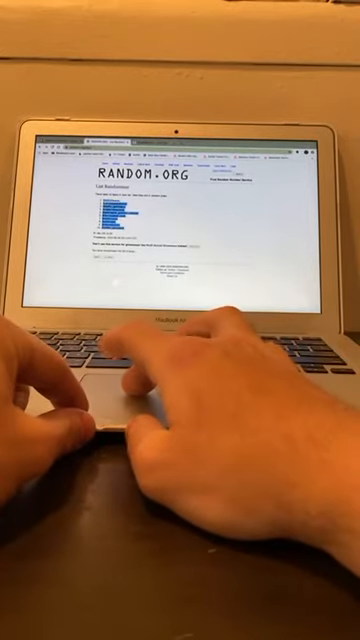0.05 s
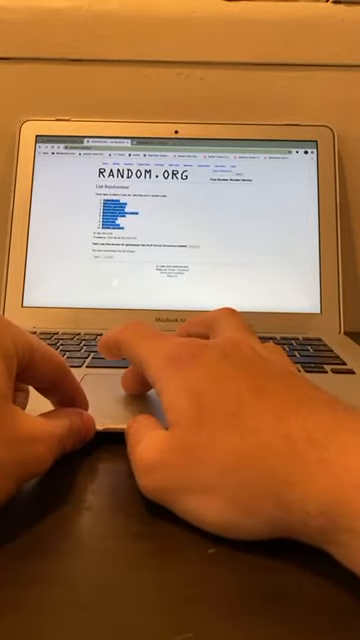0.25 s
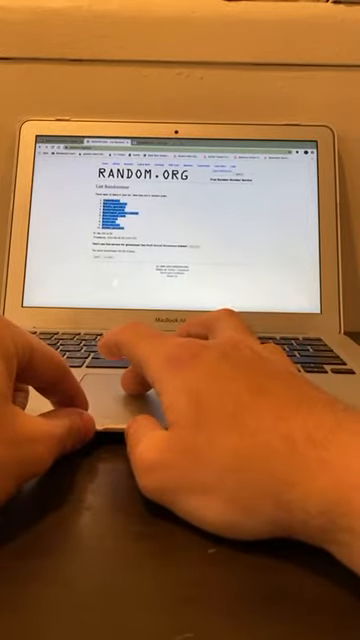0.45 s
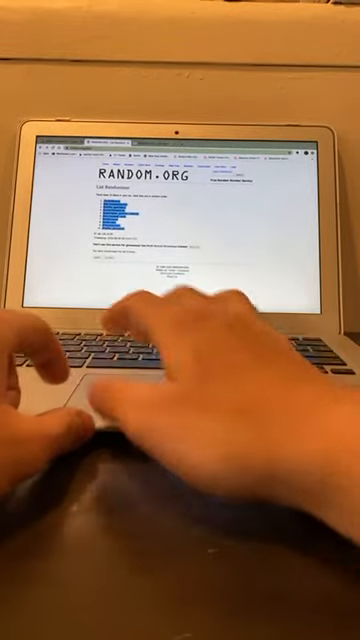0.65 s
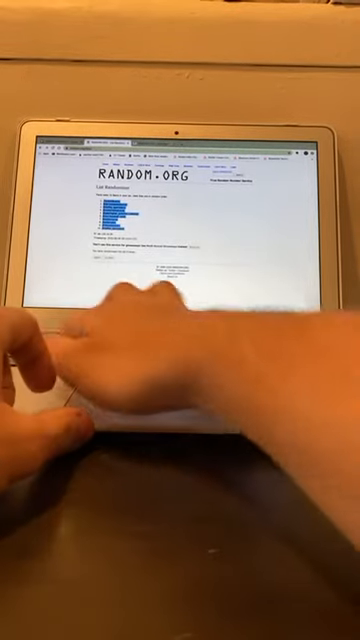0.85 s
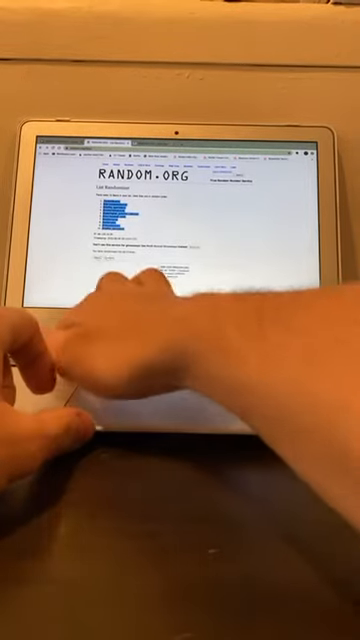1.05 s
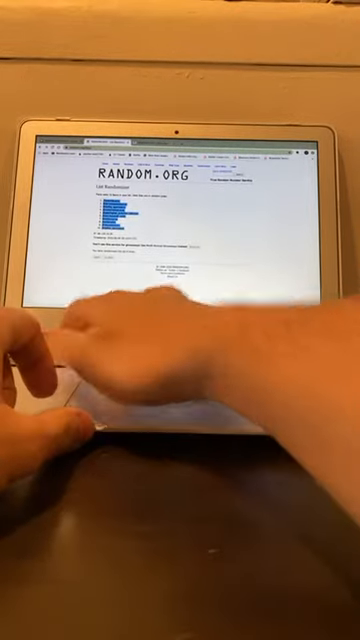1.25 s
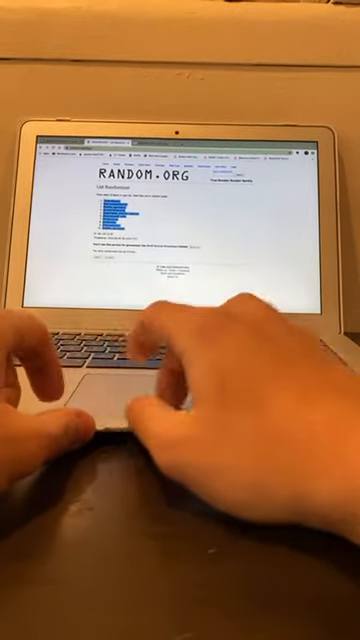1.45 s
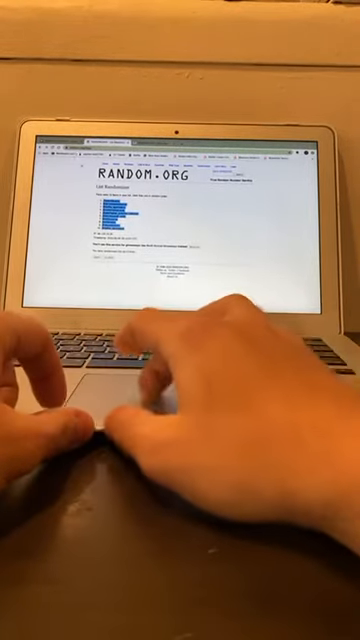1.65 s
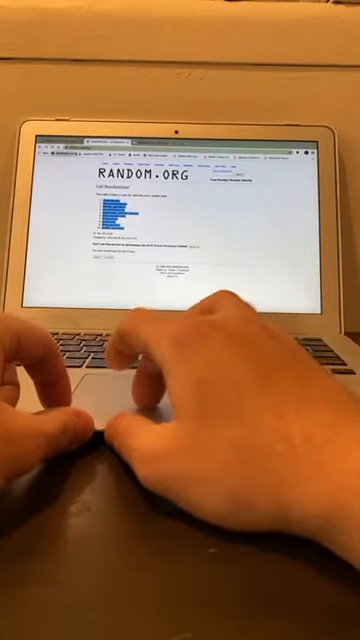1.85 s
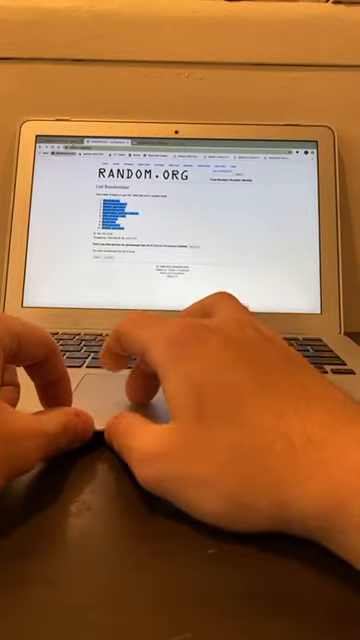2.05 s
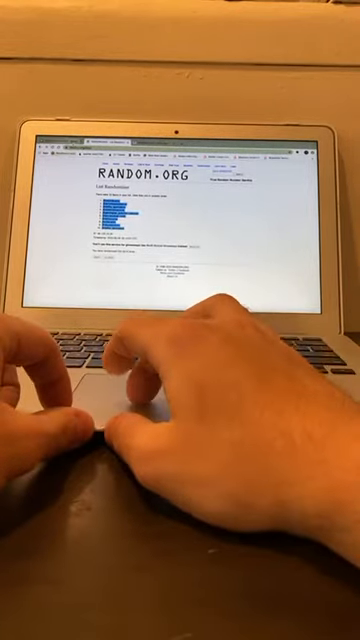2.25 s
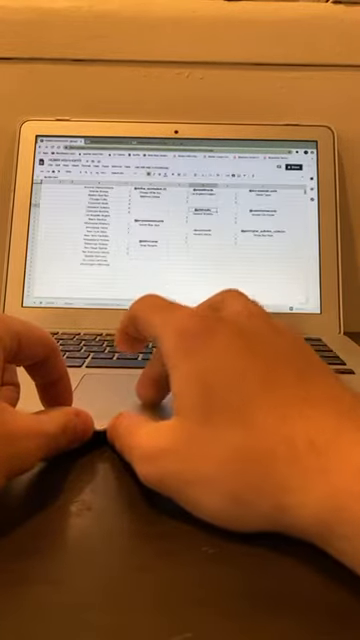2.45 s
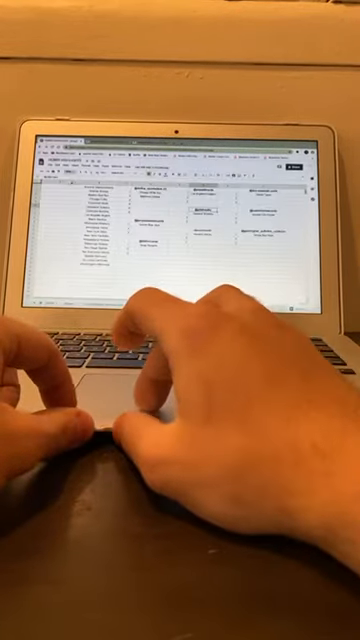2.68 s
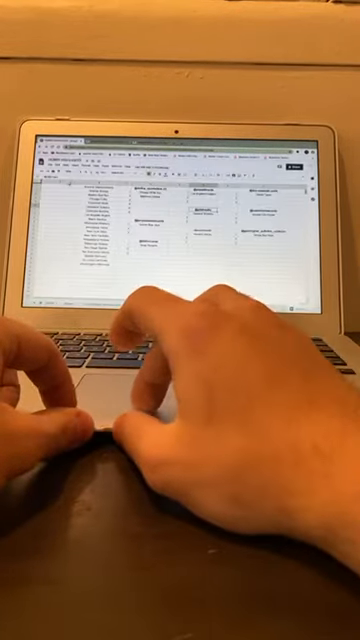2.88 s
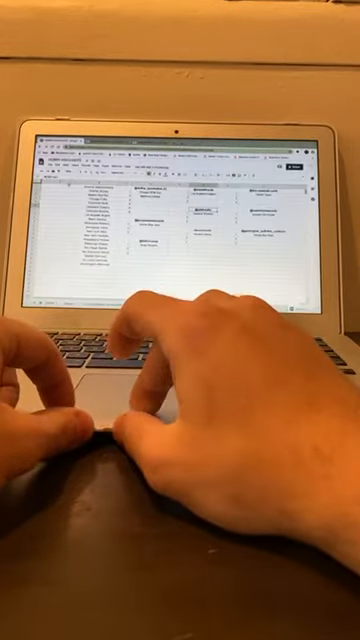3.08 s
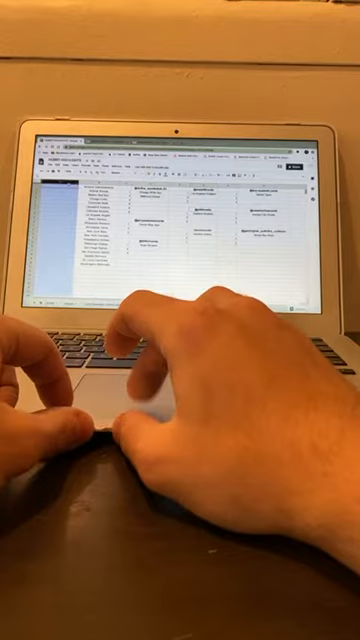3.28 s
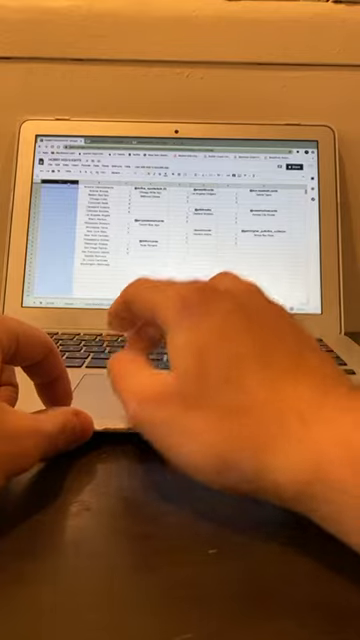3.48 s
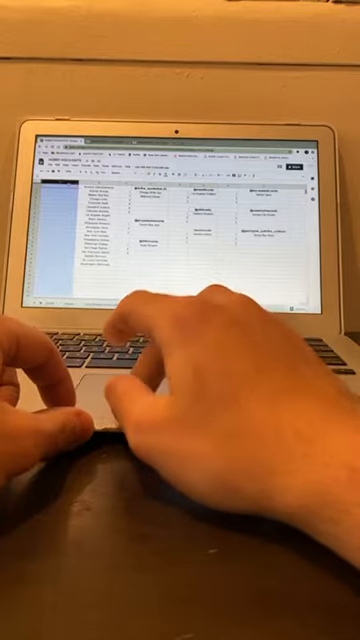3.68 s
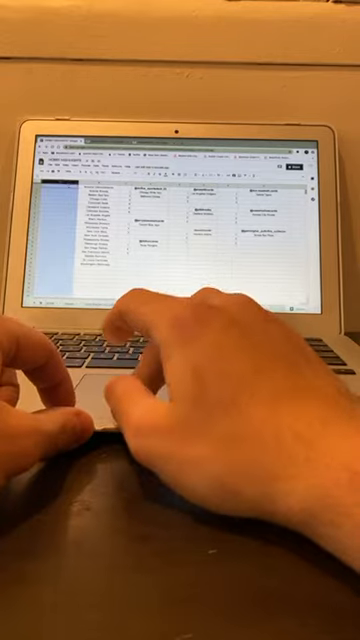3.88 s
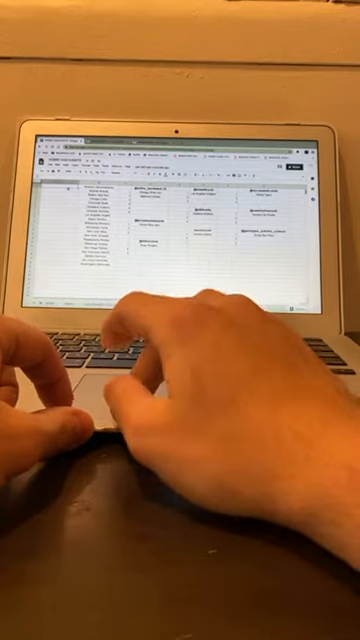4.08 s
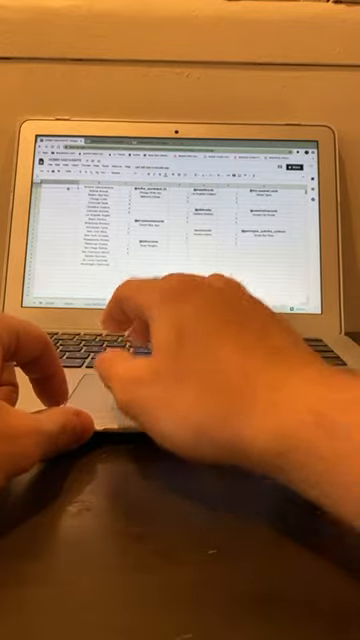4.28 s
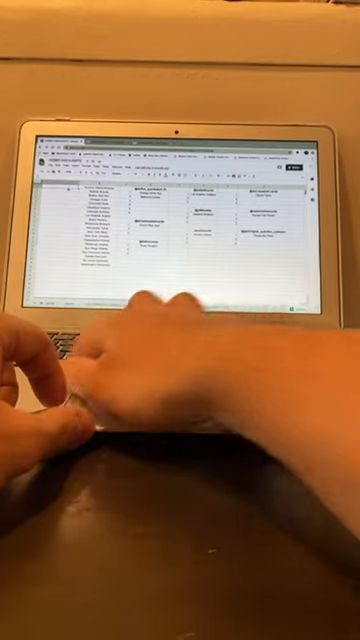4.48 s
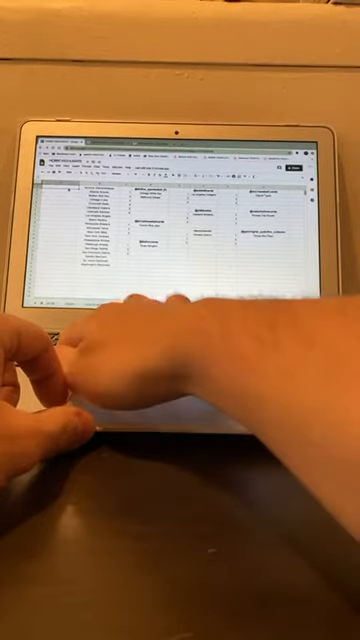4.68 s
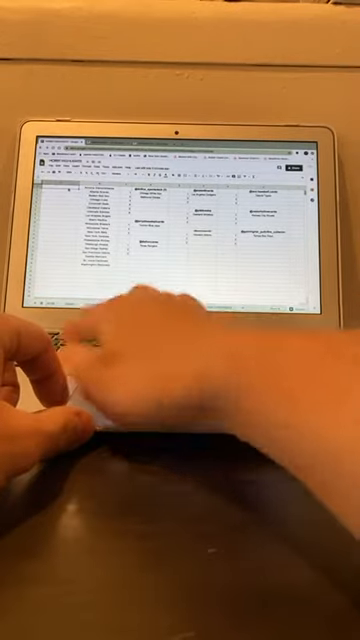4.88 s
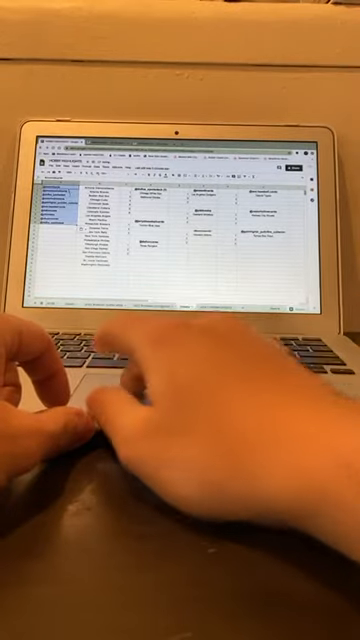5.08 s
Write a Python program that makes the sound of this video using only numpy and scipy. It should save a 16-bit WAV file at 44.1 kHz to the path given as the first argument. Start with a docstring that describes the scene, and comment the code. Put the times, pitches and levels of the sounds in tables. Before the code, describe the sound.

Close above a laptop on a wooden desk in a small quiet room, skin brushes the palm rest and a few plastic keys tick, with soft fingertip thuds on the case. The trackpad then clicks three times, about a second apart, thudding gently on each press and release. More light key ticks and brief rubs follow. A low throbbing hum and soft hiss run underneath.

```python
"""A small quiet room, close above a laptop on a wooden desk.
The trackpad clicks three times as its metal dome snaps, with a thud on each press and release.
Plastic keys tick, fingertips thud on the case and skin rubs over the desk and palm rest.
Low room resonances boom briefly after each thud.
Underneath, motors at nearly the same speed beat into a low, throbbing hum over a soft hiss."""
import sys
import numpy as np
from scipy import signal
from scipy.fft import rfft, irfft
from scipy.io import wavfile
from scipy.ndimage import uniform_filter1d

SR = 44100
rng = np.random.default_rng(int(sys.argv[2]) if len(sys.argv) > 2 else 0)


def dump(signal):
    """Clip the signal to [-1, 1] and save it as 16-bit WAV at the path in sys.argv[1]."""
    limited = np.clip(np.atleast_2d(signal).T, -1, 1)
    pcm = np.round(limited * 32767).astype(np.int16)
    wavfile.write(sys.argv[1], SR, pcm)


N = 226363
HIT_SAMPLES = 16384
TIME = np.arange(N) / SR
HIT_TIME = TIME[:HIT_SAMPLES]

# Trackpad presses. Each row: start in seconds, level in dB, tilt in dB per octave, hold in seconds.
PAD_PRESSES = [(2.0873, -41, 1.8, 0.084), (2.9277, -42.5, 1, 0.18), (3.893, -42.5, 1, .125)]


def trackpad(lag_cycles=3.03, rise_s=0.00016, plate_t60=0.02, snap_db=-1, rattle_db=-12):
    """A metal dome snaps under the pad; the plate's swing dies fast and the case rattles on."""
    # Modes of the pad and its case. Each row: frequency in Hz, level in dB.
    pad_modes = [(602, -12), (990, -1.5), (1106, 3.5), (1466, -3.5), (1655, -18), (2016, 2.5),
                 (2255, -29.5), (2382, -0.5), (2982, 7.5), (3229, 7), (3415, 3), (3980, 0), (4158, 4.5),
                 (4433, 5), (4581, -23), (4774, 0), (5044, -4), (5652, 2.5), (6101, -8), (6301, -24),
                 (6435, -1), (6578, -8), (6920, -1.5), (7079, -28), (7219, -24), (7730, -36), (7953, -13),
                 (8109, -11), (8303, -26), (8559, -4)]
    # Colours of the snapping dome and the ringing case. Each row: frequency in Hz, level in dB.
    dome_colour = [(400, -10), (800, -2), (2000, 7.5), (3000, -25), (3800, -31), (5400, 11.5), (7000, -30),
                   (8800, -6), (10300, -10), (11800, -7), (16000, -25)]
    rattle_colour = [(200, -19), (430, 14), (750, -31), (1100, -1), (1700, -7), (2400, 6), (3100, -9),
                     (4400, -27), (6000, -4), (8600, 4), (10000, -14), (16000, -26)]
    hz, db = np.transpose(pad_modes)
    age = np.maximum(HIT_TIME - lag_cycles / hz[:, None], 0)  # high bending waves arrive first
    swings = np.sin(2 * np.pi * hz[:, None] * age) * decay(plate_t60, age) * (1 - np.exp(-age / rise_s))
    # The same pad is pressed each time, so one rattle serves every click.
    rattle = noise(rattle_colour, HIT_SAMPLES) * decay(t60=0.16) * ramp(rise_s=0.0012)
    out = np.zeros(N)
    for start, level_db, tilt_db, _ in PAD_PRESSES:
        plate = unit_crest(undb(db + tilt_db * np.log2(hz)) @ swings, window=176)
        snap = noise(dome_colour, HIT_SAMPLES, tilt_db) * decay(t60=0.022)
        add(out, start, undb(level_db) * (plate + undb(snap_db) * snap + undb(rattle_db) * rattle))
    return out


def key_ticks(rise_s=0.00061, ring_octaves=0.14, settle_s=0.0077, settle_tilt_db=5):
    """A touched key gives a short plastic crackle, then settles with a brighter, longer one."""
    # Key and fingernail contacts. Each row: start in seconds, level in dB, tilt in dB per octave,
    # ring frequency in Hz, ring level in dB, settling level in dB relative to the touch.
    contacts = [(.444, -58, -4, 3320, -1.5, -4), (.8162, -48, -8.5, 1800, -8, -14),
                (0.842, -48, 8.5, 8400, -8, -2.5), (1.035, -38.5, -2.1, 8200, -11, -6),
                (1.133, -51.5, 1.5, 1420, -10.5, -1.5), (1.168, -55, 1.5, 6740, -7, -3),
                (1.6387, -55.5, -2.5, 2810, -4, -5.5), (2.3065, -62.5, -1.5, 6170, -8, -15),
                (3.2752, -53, -3.5, 2440, -11, -21), (4.0302, -68.5, -4, 6370, 6, -26),
                (4.0915, -57.5, -0.5, 2720, -4, -10), (4.3848, -47.5, 1, 6550, -4, -4.5),
                (4.4915, -60.5, -8.5, 1990, -9, -16), (4.629, -46, 1.2, 8500, 0, -6),
                (4.723, -52.5, 1, 1394, -10.5, -4), (4.743, -58, 0, 8470, -2, -5.5)]
    # Colour of a plastic key. Each row: frequency in Hz, level in dB.
    key_colour = [(150, -30), (400, -19), (1400, -3), (2500, -5.5), (3400, -1), (4300, -2), (5700, -1),
                  (8700, -4), (9800, -11), (14000, -20), (16000, -15)]

    def crackle(tilt_db, ring_hz, ring_db, t60):
        """A burst of plastic noise with one broad resonance."""
        low_hz, high_hz = ring_hz * 2 ** -ring_octaves, ring_hz * 2 ** ring_octaves
        crack = noise(key_colour, HIT_SAMPLES, tilt_db)
        ring = noise([(low_hz, -30), (ring_hz, 0), (high_hz, -30), (SR / 2, -90)], HIT_SAMPLES)
        return (crack + undb(ring_db) * ring) * decay(t60) * (1 - np.exp(-HIT_TIME / rise_s))

    out = np.zeros(N)
    for start, level_db, tilt_db, ring_hz, ring_db, settle_db in contacts:
        touch = crackle(tilt_db, ring_hz, ring_db, t60=0.04)
        settle = crackle(tilt_db + settle_tilt_db, ring_hz, ring_db, t60=0.081)
        add(out, start, undb(level_db) * touch)
        add(out, start + settle_s, undb(level_db + settle_db) * settle)
    return out


def thuds(press_db=-5, press_hz=320, release_hz=186.5, echo_s=0.019, echo_db=-10):
    """Fingertips, pad presses and pad releases thud softly; a short room echo follows each thud."""
    # Fingertips landing on the case. Each row: start in seconds, level in dB, centre frequency in Hz.
    fingertips = [(.458, -42.5, 203), (.819, -50.5, 380), (1.039, -39.5, 268), (1.041, -30, 105),
                  (1.098, -42, 82), (1.156, -48.5, 202), (1.377, -32.5, 79.7), (1.717, -33.5, 94),
                  (2.305, -37, 84), (3.519, -38.5, 70), (4.629, -48.5, 103), (4.74, -46, 125),
                  (5.006, -48, 70)]
    presses = [(start, db + press_db, press_hz) for start, db, _, _ in PAD_PRESSES]
    releases = [(start + hold, db, release_hz) for start, db, _, hold in PAD_PRESSES]
    out = np.zeros(N)
    for start, level_db, centre_hz in fingertips + presses + releases:
        thud = undb(level_db) * low_boom(centre_hz)
        add(out, start, thud)
        add(out, start + echo_s, undb(echo_db) * thud)
    return out


def low_boom(centre_hz, soft_hz=90, lag_cycles=1.25):
    """Low room resonances boom briefly: a soft touch wakes the lowest, a harder one a wider range."""
    # Low room modes. Each row: frequency in Hz, level in dB, t60 in seconds.
    room_modes = [(58.7, 12.5, 0.13), (86.1, 3.5, 0.27), (110.6, 0, 0.11), (142, 0.5, 0.18),
                  (249.8, -15.5, 0.22), (303, -11, 0.094), (356, -13.5, 0.06), (440, -9.5, 0.09),
                  (597, -11.5, 0.073)]
    spread_octaves = 0.52 * (centre_hz / soft_hz) ** 0.47
    boom = np.zeros(HIT_SAMPLES)
    for k, (hz, db, t60) in enumerate(room_modes):
        scatter_db = rng.normal(0, 1.2)  # balance and pitch vary a little from thud to thud
        detune = rng.normal(0, 0.02)
        age = np.maximum(HIT_TIME - lag_cycles / hz, 0)  # lower modes start later
        push = np.exp(-0.5 * (np.log2(hz / centre_hz) / spread_octaves) ** 2)
        swell = np.sin(np.pi / 2 * np.minimum(age * hz, 1)) ** 2  # builds over one cycle
        swing = np.sin(2 * np.pi * hz * (1 + detune) * age) * decay(t60, age)
        boom += (-1) ** k * undb(db + scatter_db) * push * swell * swing  # alternating polarity
    return unit_crest(boom, window=441)


def hand_rubs(grain_db=0.6, catch_db=1.18, firm_tilt_db=0.7, tilt_per_db=0.043):
    """Skin rubs in countless tiny slips; a firmer slide is louder and brighter."""
    # Hand slides over desk and palm rest, and light fingertip glides along the case.
    # Each row: start, attack and hold in seconds, level in dB.
    slides = [(0.42, 0.15, .03, -60), (0.528, 0.028, 0.045, -46.5), (1.303, 0.024, 0.063, -54),
              (3.316, 0.037, 0.031, -61), (4.122, 0.062, 0.023, -51.5), (4.903, 0.062, 0.059, -58)]
    glides = [(.6, 0.26, .05, -65.5), (4.003, .11, .04, -70), (4.35, 0.071, .03, -74)]
    # Colours of rubbing skin and of the stroked case. Each row: frequency in Hz, level in dB.
    skin_colour = [(500, -7.5), (1200, -11), (2100, -9), (2500, -4), (3700, -2), (5500, -3.5), (7000, -4.5),
                   (8300, -4.5), (9600, -13), (11500, -17), (16000, -25)]
    case_colour = [(600, 5.5), (1500, 0.5), (3800, -4.5), (4300, 6.5), (4800, -3), (7400, 1.5), (8300, 0),
                   (9500, -3.5), (16000, -14)]
    firmest_db = max(db for *_, db in slides)
    rub = np.zeros(N)
    for *timing, db in slides:
        tilt_db = firm_tilt_db + tilt_per_db * (db - firmest_db)
        rub += noise(skin_colour, N, tilt_db) * undb(db) * stroke(*timing, fall_db_per_s=350)
    glide_gain = sum(undb(db) * stroke(*timing, fall_db_per_s=41) for *timing, db in glides)
    rub += noise(case_colour, N) * glide_gain
    roughness = undb(grain_db * wander(rate_hz=1500) + catch_db * wander(rate_hz=90))
    return rub * unit_rms(roughness)


def stroke(start, attack, hold, fall_db_per_s):
    """Envelope of one rub: the hand speeds up, keeps its pace, then slows or lifts."""
    age = TIME - start
    rise = np.sin(np.pi / 2 * np.clip(age / attack, 0, 1))
    return rise * undb(-fall_db_per_s * np.maximum(age - attack - hold, 0))


def room(direct, wall_s=0.0085, wall_db=-13, tail_db=-7):
    """The wall behind the desk throws back one reflection, and a short tail follows."""
    tail_colour = [(150, -8), (1000, -9), (8500, -18.5), (11000, -9.5), (16000, -13)]
    tail = noise(tail_colour, HIT_SAMPLES) * decay(t60=0.13) * ramp(wall_s)
    response = undb(tail_db) * tail / np.linalg.norm(tail)
    response[int(wall_s * SR)] += undb(wall_db)
    return direct + signal.fftconvolve(direct, response)[:N]


def motor_hum(speeds_hz=(58.87, 59.3, 65.15), in_step_s=1.29, waver_db=1.04):
    """Three wavering motor tones beat against each other, all in phase at in_step_s."""
    # Level of each motor in dB.
    levels_db = [-52, -59, -54.5]
    hum = np.zeros(N)
    for hz, db in zip(speeds_hz, levels_db):
        amplitude = np.sqrt(2) * undb(db + waver_db * wander(rate_hz=1.84))
        hum += amplitude * np.cos(2 * np.pi * hz * (TIME - in_step_s))
    return hum


def room_tone(rumble_db=-57, hiss_db=-65.5):
    """A steady bed of faint room rumble and hissing air."""
    # Colours of the rumble and the air. Each row: frequency in Hz, level in dB.
    rumble_colour = [(22, -19), (33, -24.5), (43, 16.5), (52, 2.5), (70, 11), (88, 7), (118, 9.5),
                     (170, -38)]
    air_colour = [(120, -2.5), (175, -2), (220, -6), (330, -2), (450, -9), (800, -13.5), (1500, -18),
                  (3000, -20.5), (5500, -25), (8300, -26.5), (10000, -32.5), (13000, -37.5), (16000, -43)]
    return undb(rumble_db) * noise(rumble_colour, N) + undb(hiss_db) * noise(air_colour, N)


def undb(db):
    """Decibels to gain."""
    return 10 ** (np.asarray(db) / 20)


def unit_rms(x):
    """Scale to rms 1."""
    return x / np.sqrt(np.mean(x ** 2))


def unit_crest(x, window):
    """Scale so that the loudest stretch of `window` samples has rms 1."""
    return x / np.sqrt(uniform_filter1d(x ** 2, window).max())


def ramp(rise_s):
    """Linear attack of one hit."""
    return np.minimum(HIT_TIME / rise_s, 1)


def decay(t60, age=HIT_TIME):
    """Exponential decay that loses 60 dB in t60 seconds."""
    return np.exp(-np.log(1000) * age / t60)


def noise(colour, size, tilt_db=0):
    """Noise of rms 1, shaped by (Hz, dB) points and tilted by tilt_db per octave."""
    hz, db = np.transpose(colour)
    octave = np.log2(np.fft.rfftfreq(size, 1 / SR) + 1)
    curve_db = np.interp(octave, np.log2(hz), db + tilt_db * np.log2(hz), left=-np.inf)
    return unit_rms(irfft(rfft(rng.standard_normal(size)) * undb(curve_db), size))


def wander(rate_hz):
    """Random drift of rms 1 that glides to a new value rate_hz times a second."""
    step = int(SR / rate_hz)
    stairs = np.repeat(rng.standard_normal(N // step + 1), step)
    return unit_rms(uniform_filter1d(stairs, step)[:N])


def add(track, start, sound):
    """Mix a sound in at `start` seconds."""
    i = int(start * SR)
    track[i:i + len(sound)] += sound[:N - i]


def scene():
    """Mono mix: clicks with their room tail, then thuds, rubs, hum and room tone."""
    clicks = room(trackpad() + key_ticks())
    return (clicks + thuds() + hand_rubs() + motor_hum() + room_tone())[None]


def record(dry, mic_hz=13900, top_hz=15700):
    """A phone microphone dulls the highest treble, then a steep low-pass cuts off the top."""
    dulled = signal.sosfilt(signal.butter(2, mic_hz, fs=SR, output="sos"), dry)
    return signal.sosfilt(signal.ellip(10, 0.1, 70, top_hz, fs=SR, output="sos"), dulled)


dry = scene()
out = record(dry)
dump(out)
```